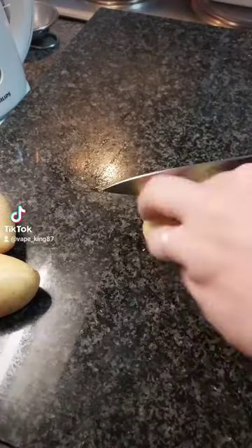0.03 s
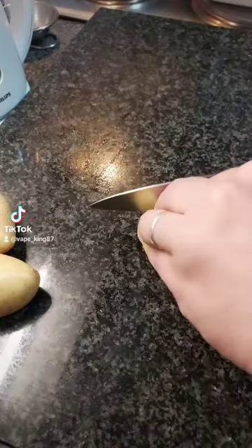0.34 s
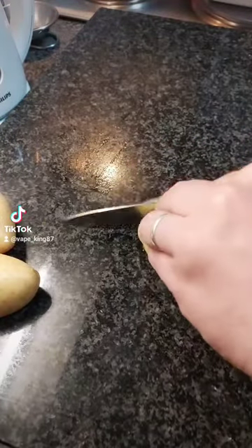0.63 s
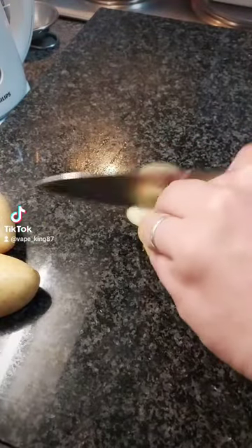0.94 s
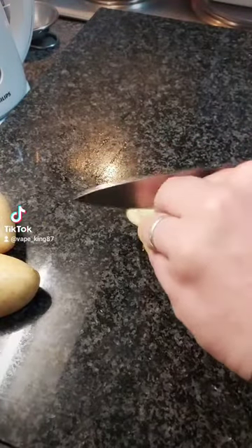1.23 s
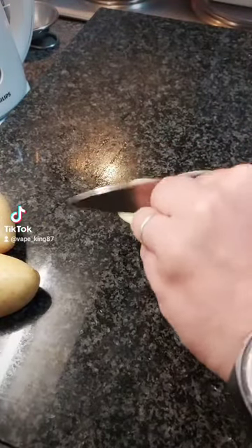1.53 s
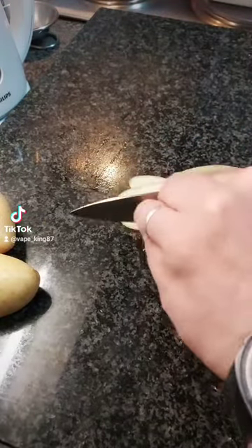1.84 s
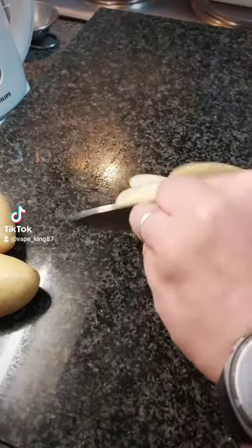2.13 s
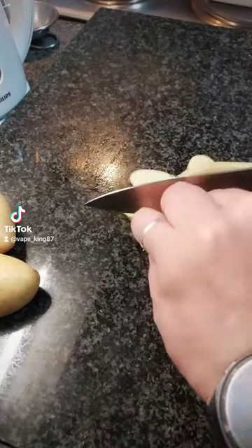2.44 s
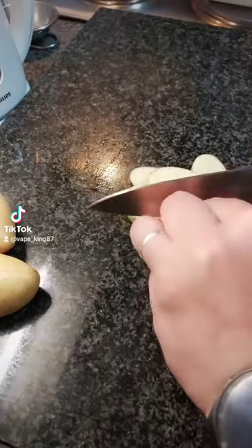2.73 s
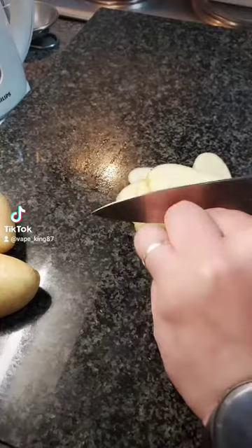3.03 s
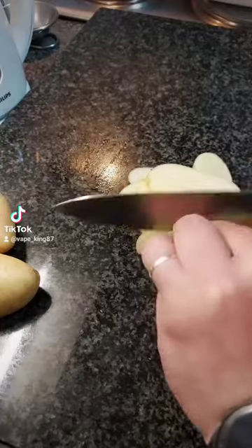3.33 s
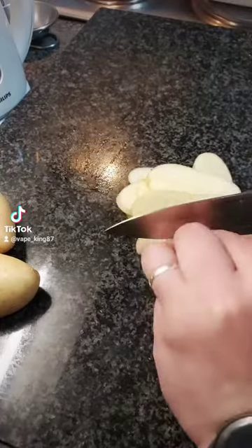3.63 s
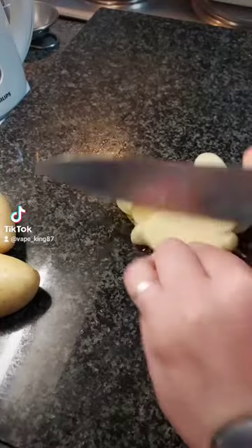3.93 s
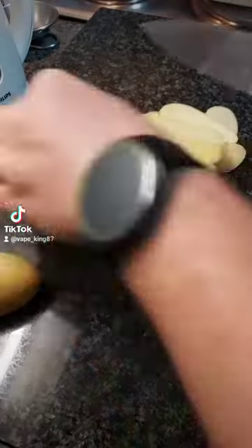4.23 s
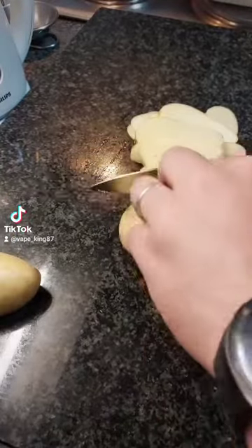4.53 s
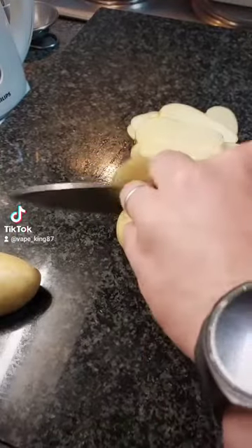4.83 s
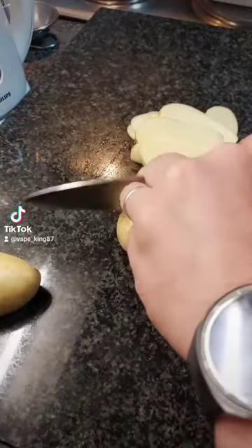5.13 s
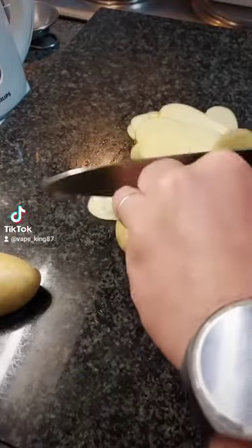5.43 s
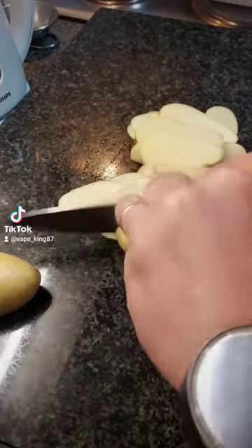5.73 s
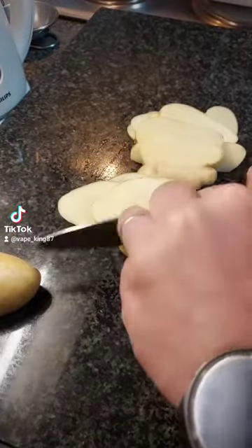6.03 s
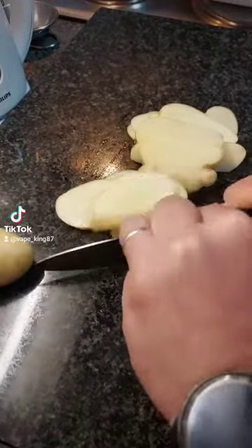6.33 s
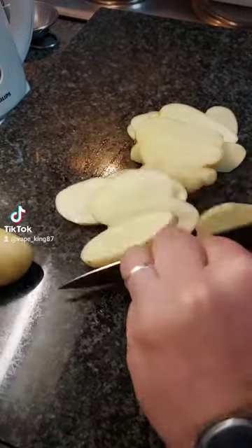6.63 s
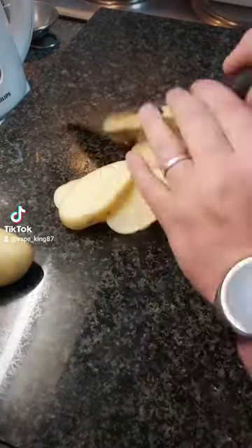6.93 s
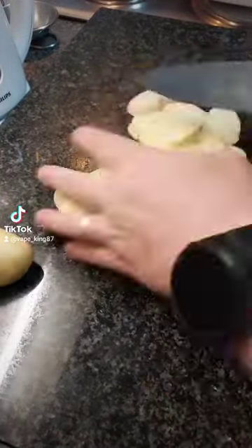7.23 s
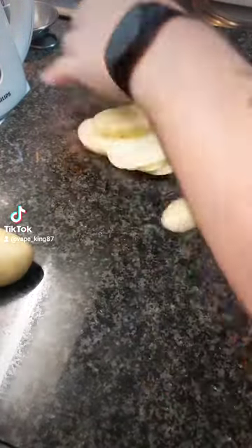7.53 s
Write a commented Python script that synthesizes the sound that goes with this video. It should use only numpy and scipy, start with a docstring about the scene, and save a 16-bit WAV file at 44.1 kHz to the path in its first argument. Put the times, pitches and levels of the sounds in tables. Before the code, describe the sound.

A knife cuts through raw potatoes close to the microphone, with crisp little rasps and hard clacks of steel on a stone counter. The knocks come steadily, grow softer and further apart, then pick up in a quick burst before stopping near the end. The small kitchen adds a short echo, and a draught buffets the microphone throughout with an uneven rumble and a low hum.

```python
"""Moving air rumbles on the two microphones of a propped-up phone in a small kitchen, and hoots once.
Then, close by, a steel knife slices raw potatoes on a stone worktop: each stroke hisses through
the wet flesh, and the blade knocks on the stone and rings between the near walls.
A hollow at the right microphone turns the air and the knocks into a low hum."""
import sys
import numpy as np
from scipy import signal
from scipy.fft import rfft, irfft, next_fast_len
from scipy.io import wavfile
from scipy.ndimage import uniform_filter1d

SR = 44100
rng = np.random.default_rng(int(sys.argv[2]) if len(sys.argv) > 2 else 0)


def to_wav(sig):
    """Store sig (one row per channel, or 1-D mono) as 16-bit WAV at the path in sys.argv[1].

    Samples outside -1..1 are clipped; the rate is SR.
    """
    pcm = np.clip(np.atleast_2d(sig), -1, 1) * 32767
    pcm = np.round(pcm).astype(np.int16)
    wavfile.write(sys.argv[1], SR, pcm.T)  # frames by channels


N = 343998
TIME = np.arange(N) / SR

# Knife strokes, levels relative within each column:
# contact t/s, time in the flesh/s, crunch/dB, contact rise/s, thud/dB, clack/dB, ring/dB, edge tick/dB
STROKES = [(0.478, 0.075, -20, .0006, -41, -12.5, -14, -14.5),
           (0.738, 0.044, -26, 0.00063, -21, -15.5, -15.5, -15),
           (0.976, 0.056, -24, 0.0063, -16, -25, -20, -42),
           (1.214, 0.039, -28, 0.00055, -20, -11.5, -15.5, -14),
           (1.438, 0.047, -26, 0.0068, -17, -21.5, -17, -48),
           (1.677, 0.035, -29.5, 0.0016, -17.5, -11, -16, -12),
           (1.973, 0.052, -26.5, 0.0077, -19.5, -22.5, -22, -17),
           (2.256, 0.068, -27, 0.01, -30, -30.5, -34.5, -29.5),
           (2.595, .055, -32, 0.00066, -22.5, -19, -22.5, -15),
           (2.946, 0.076, -31.5, 0.0053, -24.5, -16, -32.5, -22.5),
           (3.367, 0.14, -29, .011, -27.5, -27.5, -34, -23.5),
           (3.922, 0.106, -20.5, 0.0061, -21, -23.5, -27.5, -24),
           (4.736, .071, -23, 0.00057, -16.5, -16, -17, -34),
           (4.902, 0.041, -33.5, 0.0032, -16, -11, -15.5, -23),
           (5.084, 0.056, -32.5, 0.0048, -11, -25, -28, -52),
           (5.268, 0.077, -30.5, 0.0073, -20.5, -25.5, -21.5, -35),
           (5.455, 0.052, -29, 0.0022, -19, -21.5, -24.5, -49),
           (5.618, .054, -33, 0.0039, -16, -14, -17.5, -25),
           (5.804, 0.048, -29.5, .004, -18.5, -24.5, -21.5, -49),
           (5.989, 0.051, -27, 0.0018, -23.5, -23.5, -23, -20.5),
           (6.16, 0.066, -32, 0.0011, -13.5, -10, -16, -16),
           (6.425, .059, -22, 0.0027, -23, -22.5, -24.5, -18),
           (6.74, 0.088, -42.5, 0.00072, -16, -13, -19.5, -15)]
# modes of blade and worktop at the two microphones: f/Hz, width/Hz, left/dB, right/dB
KNIFE_MODES = [(1022, 14, -10.5, 1), (1104, 6, -20.5, -30), (1249, 25, -2.5, -21), (1374, 5.7, -3, -29),
               (1572, 53, 3.5, -1), (1618, 33, -4, 1), (2210, 34, 1, -2), (2823, 20, -7.5, 2.5),
               (3286, 40, 2.5, 6), (4024, 130, -32.5, -9.5), (4335, 71, -28, -22.5), (4504, 44, -8, 2),
               (4640, 120, -1, -12.5), (5100, 49, -6.5, -24), (5307, 26, -3.5, -2), (5550, 26, -4, -5.5),
               (6350, 34, -5, -20.5), (6720, 20, -3.5, -18), (7455, 26, -15, -1.5), (8070, 51, -11, -10.5),
               (8560, 31, -22.5, -8.5), (8850, 21, -13.5, -20.5), (10130, 60, -13, -13.5),
               (13400, 70, -15, -22), (13900, 70, -18, -14.5)]
# spectra of the parting flesh, the crack of steel on stone and the edge's tick: f/Hz, level/dB
CRUNCH_SPECTRUM = [(300, -15), (1000, -9.5), (2500, -5), (4700, -8), (7000, -7), (8700, -6.5),
                   (10000, -3.5), (12500, 0), (16000, -7.5)]
CRACK_SPECTRUM = [(250, -5), (400, 0.5), (540, 12.5), (800, -18.5), (1200, 10.5), (2000, -1.5),
                  (2600, -5.5), (4600, -14), (6500, -22), (9000, -15.5), (16000, -28)]
TICK_SPECTRUM = [(1000, -16), (4000, 8), (8500, -3), (10000, 1.5), (12500, 5), (16000, -11.5)]
# the draught at the microphones, relative levels: t/s, rumble and hum/dB, eddies/dB
DRAUGHT_LEVELS = [(0.0, -31.5, -35), (0.35, -25, -34.5), (0.5, -33.5, -41.5), (1.0, -43, -49.5),
                  (1.63, -33, -51.5), (2.45, -33.5, -49), (2.93, -27, -49.5), (3.63, -35.5, -53),
                  (4.0, -25, -44), (4.34, -26, -47), (4.54, -20.5, -43), (4.84, -36, -50),
                  (5.97, -42, -59.5), (6.52, -38.5, -43.5), (6.69, -27, -34), (7.19, -33, -39),
                  (7.47, -24, -30), (7.8, -27, -38)]
# gusts on top of it: start t/s, length/s, rumble/dB, hum/dB
AIR_GUSTS = [(0.239, 0.023, -20, -11.5), (0.816, 0.089, -33, -18.5), (1.524, 0.086, -29, -31),
             (1.627, 0.028, -21.5, -12), (2.192, 0.044, -22, -8), (2.31, 0.075, -30, -15),
             (2.511, 0.041, -23, -23), (2.758, 0.18, -22.5, -13), (3.03, 0.076, -25.5, -22.5),
             (3.25, 0.1, -24.5, -22), (3.827, 0.095, -17, -16), (4.005, 0.075, -23, -12),
             (4.391, 0.028, -13.5, -29), (4.493, 0.075, -19.5, -18), (4.656, 0.06, -15, -22),
             (6.527, .18, -12.5, -7), (6.749, 0.11, -33, -14.5), (7.257, 0.059, -15, -16),
             (7.399, 0.065, -15, -21), (7.592, 0.048, -21, -8.5)]
# course of the air's hiss: t/s, level/dB
HISS_LEVELS = [(0, -33), (.15, -27), (.45, -28.5), (.55, -39), (1.1, -41.5), (2.4, -47.5), (3.6, -48.5),
               (3.85, -37), (4.1, -39), (4.65, -32), (4.8, -43), (6.3, -50), (6.6, -43.5), (6.9, -59.5),
               (7.2, -53), (7.45, -44.5), (7.8, -42.5)]
# spectra of the air's rumble, eddies and hiss: f/Hz, level/dB
RUMBLE_SPECTRUM = [(15, -21.5), (30, -14), (55, -3), (90, 1), (140, 1.5), (220, -0.5), (300, -14),
                   (420, -11), (700, -26), (1500, -41.5), (4000, -105)]
EDDY_SPECTRUM = [(100, 6.5), (300, 3.5), (470, 5), (750, -1), (1100, -9), (1650, -13), (2400, -22),
                 (4000, -47.5), (9000, -57), (16000, -58.5)]
HISS_SPECTRUM = [(300, -22), (900, 2), (1700, 6.5), (2300, 0.5), (3300, -8), (5000, -9.5), (8500, -19.5),
                 (11500, -13.5), (16000, -26.5)]
# resonances of the hollow at the right microphone: f/Hz, width/Hz, relative level/dB
HOLLOW_MODES = [(269, 10.9, 5), (1020, 31, 12.5), (1758, 24, 7.5), (2870, 38, 2), (3400, 42, 6)]
# rumble at the sheltered right microphone against the left: f/Hz, gain/dB
RIGHT_SHELTER = [(100, -2.5), (200, -2.5), (280, 8.5), (380, -11.5), (1000, -19)]

HUM_HZ, HUM_WIDTH_HZ = HOLLOW_MODES[0][:2]
HARD_CLACK_DB = -11  # a clack entry this high marks a hard stroke


def knife(scatter_db=1.05, tilt_db_per_octave=1.25, even_rise_s=0.0014):
    """Each stroke cuts, then knocks. Returns the close sound and what goes out into the room."""
    direct, to_room = np.zeros((2, 2, N))
    t = np.arange(14400) / SR - .14  # steel meets stone at t = 0
    modes = mode_responses(len(t))
    mode_hz = np.array(KNIFE_MODES)[:, 0]
    family = np.digitize(mode_hz, [1180, 2500])  # low modes thud, middle ones clack, high ones ring
    octaves = np.log2(mode_hz / mode_hz[0])
    for when, length, crunch_db, rise, thud_db, clack_db, ring_db, tick_db in STROKES:
        # a quicker contact favours the blade's upper modes
        tilt_db = tilt_db_per_octave * np.log2(even_rise_s / rise) * octaves * (family == 2)
        # each stroke lands on another spot of the edge and favours other modes
        spot_db = scatter_db * rng.standard_normal(len(modes))
        struck = modes * undb(tilt_db + spot_db)[:, None, None]
        bodies = [struck[family == k].sum(axis=0) for k in range(3)]
        cut = at_peak(crunch(t, length, blade=bodies[2]), crunch_db)
        stroke = cut + knock(t, bodies, rise, thud_db, clack_db, ring_db, tick_db)
        # the harder the clack, the drier the stroke; the last one stops dead
        send_db = np.interp(HARD_CLACK_DB - clack_db, [0, 7.5], [-4.5, 1.5])
        if when == STROKES[-1][0]:
            send_db = -15.5
        add(direct, stroke, when + t[0])
        add(to_room, stroke * undb(send_db), when + t[0])
    return direct, to_room


def crunch(t, length, blade, swell_db_per_s=270, grain_db=2.5, jerk_db=3.0, entry_s=0.0083, t60=0.046):
    """The edge breaks the skin and rasps through the cells up to a last snap; the blade sings along."""
    cells = rng.standard_normal((2, len(t)))
    cells *= undb(grain_db * np.repeat(rng.standard_normal(len(t) // 20), 20))
    jerks = np.interp(t, np.linspace(t[0], t[-1], num=80), rng.standard_normal(80))
    entry = np.clip((t + length) / entry_s, 0, 1)
    depth = np.clip((t + length) / (length - .008), 0, 1)
    swell_db = -swell_db_per_s * length * (1 - depth ** 1.11)  # a slow cut starts more quietly
    bursts = cells * entry * undb(swell_db + jerk_db * jerks) * fade(t + 0.004, t60)
    flesh = unit(colour(bursts, CRUNCH_SPECTRUM))
    steel = unit(irfft(rfft(bursts) * blade))
    return flesh + undb(-11) * steel


def knock(t, bodies, rise, thud_db, clack_db, ring_db, tick_db):
    """The edge lands and grates for a moment, driving the modes of blade and worktop."""
    drag_s = 6 * rise  # a soft landing grates longer
    dwells_s = np.array([0.0042, .0055, .008])  # thud, clack, ring
    levels_db = (thud_db - 4.0, clack_db - 2, ring_db + 0.27)
    pressure = strike(t, rise, t60=0.0053 + drag_s, dwell=dwells_s[:, None, None])
    grate = rng.standard_normal((3, 2, len(t))) * pressure
    out = sum(at_peak(irfft(rfft(force) * body), db) for force, body, db in zip(grate, bodies, levels_db))
    # the very first touch of steel on stone is the sharpest
    first_touch = 1 + 1.2 * np.exp(-((t - .0012) / 0.0015) ** 2)
    crack, tick = rng.standard_normal((2, 2, len(t))) * first_touch
    crack = colour(crack, CRACK_SPECTRUM) * strike(t, rise, t60=0.051 + drag_s, dwell=dwells_s[0])
    tick = colour(tick, TICK_SPECTRUM) * strike(t, rise / 2, t60=0.044 + drag_s)
    out += at_peak(crack, (clack_db + ring_db) / 2 - 5.5)
    out += at_peak(tick, tick_db - 5.0)
    # the blow also sets the hollow at the right microphone humming
    hum = np.sin(2 * np.pi * HUM_HZ * t) * strike(t, rise=0.005, t60=0.2)
    force_db = max(thud_db, clack_db) - HARD_CLACK_DB
    out[1] += undb(-13 + 0.17 * force_db) * hum
    return out


def mode_responses(size):
    """Frequency response of each damped mode of blade and worktop, at the left and right microphone."""
    f = np.fft.rfftfreq(size, 1 / SR)
    return np.array([undb([[left_db], [right_db]]) * 1j * f * width / (hz ** 2 - f ** 2 + 1j * f * width)
                     for hz, width, left_db, right_db in KNIFE_MODES])


def kitchen(x, low_t60=0.32, high_t60=0.11, split_hz=6000, build_s=0.014):
    """Dense reflections from near walls and cupboards; the treble dies first."""
    t = np.arange(SR // 2) / SR
    noise = rng.standard_normal((2, len(t)))
    low = pass_band(noise, split_hz, "low") * fade(t, low_t60)
    high = pass_band(noise, split_hz, "high") * fade(t, high_t60)
    tail = (low - undb(3) * high) * np.minimum(t / build_s, 1)
    tail /= np.sqrt(np.sum(fade(t, low_t60) ** 2))
    return undb(-6) * signal.oaconvolve(x, tail, axes=1)[:, :N]


def air():
    """Moving air shakes both microphones; the left stands open, the right is sheltered by its hollow."""
    noise = rng.standard_normal((4, N))
    rumble_level, hum_level, eddy_level = airflow()
    rumble = steady(colour(noise[0], RUMBLE_SPECTRUM), seconds=0.21) * rumble_level
    hum = resonate(resonate(noise[0], HUM_HZ, HUM_WIDTH_HZ), HUM_HZ, width=50)
    hum = steady(hum, seconds=0.078) * hum_level
    eddies = unit(colour(noise[1], EDDY_SPECTRUM)) * eddy_level
    hiss = unit(colour(noise[2:], HISS_SPECTRUM)) * curve(HISS_LEVELS) * undb(2.2 * waver(per_s=38))
    open_air = eddies + hiss[1]
    hollow = sum(undb(db) * resonate(open_air, hz, width) for hz, width, db in HOLLOW_MODES)
    fizz = pass_band(hiss[1], 9000, "high")
    left = rumble + eddies + hiss[0]
    right = colour(rumble, RIGHT_SHELTER) + hum
    right += undb(-0.5) * hollow + undb(-10.5) * open_air + undb(-3.5) * fizz
    return np.array([left, right])


def airflow():
    """Gains of rumble, hum and eddies over time: the wavering draught and the gusts add in power."""
    gusts = np.array(AIR_GUSTS)
    puffs = np.array([puff(start, length, attack=0.021, t60=0.17) for start, length in gusts[:, :2]])
    gust_rumble, gust_hum = np.sqrt(undb(gusts[:, 2:].T) ** 2 @ puffs ** 2)
    gust_eddies = undb(-13.5) * gust_rumble
    rumble = curve(DRAUGHT_LEVELS) * undb(3 + 2.5 * waver(per_s=14))
    hum = curve(DRAUGHT_LEVELS) * undb(6.5 + 6.5 * waver(per_s=14))
    eddies = curve(DRAUGHT_LEVELS, column=2) * undb(8.5)
    return np.hypot(rumble, gust_rumble), np.hypot(hum, gust_hum), np.hypot(eddies, gust_eddies)


def hoot(start_s=0.349, pitch_hz=442.5, wobble=0.016, settle_s=0.0098, flutter_per_s=80):
    """Air over an opening catches with a burst, settles and flutters, mostly at the left microphone."""
    burst_db = 13 * np.exp(-np.maximum(TIME - start_s, 0) / settle_s)
    flutter_db = 2 * waver(flutter_per_s)
    level = undb(-12.5 + burst_db + flutter_db) * puff(start_s, length=.12, attack=0.0074, t60=0.025)
    hz = pitch_hz * (1 + wobble * waver(flutter_per_s))
    return undb([[0], [-18]]) * level * np.sin(2 * np.pi * np.cumsum(hz) / SR)


def strike(t, rise, t60, dwell=0):
    """Envelope of a blow: it builds around t = 0, holds while the blade presses, then dies."""
    return (1 + np.tanh(t / rise - .5)) / 2 * fade(t - rise - dwell, t60)


def puff(start, length, attack, t60):
    """Envelope of a push of air: attack, hold, release."""
    return np.clip((TIME - start) / attack, 0, 1) * fade(TIME - start - length, t60)


def fade(t, t60):
    """Decay from t = 0, by 60 dB every t60 seconds."""
    return np.exp(-np.log(1000) * np.maximum(t, 0) / t60)


def waver(per_s):
    """Random values at this rate, joined by straight lines."""
    values = rng.standard_normal(2000)
    return np.interp(TIME * per_s, np.arange(len(values)), values)


def curve(rows, column=1):
    """Gain over time from one dB column of a table."""
    rows = np.array(rows)
    return undb(np.interp(TIME, rows[:, 0], rows[:, column]))


def colour(x, spectrum):
    """Filter by a spectrum of points: f/Hz, level/dB."""
    hz, db = np.transpose(spectrum)
    size = next_fast_len(x.shape[-1], True)
    f = np.fft.rfftfreq(size, 1 / SR)
    gain = undb(np.interp(np.log(f + 1), np.log(hz), db))
    return irfft(rfft(x, size) * gain, size)[..., :x.shape[-1]]


def resonate(x, hz, width):
    """One resonance, gain 1 at its centre."""
    return signal.lfilter(*signal.iirpeak(hz, hz / width, fs=SR), x)


def pass_band(x, hz, kind):
    """Second-order low-pass or high-pass."""
    return signal.sosfilt(signal.butter(2, hz, kind, fs=SR, output="sos"), x)


def steady(x, seconds):
    """Even out the slow swells of a noise."""
    return x / np.sqrt(uniform_filter1d(x ** 2, int(seconds * SR)) + 1e-12)


def at_peak(x, db):
    """Scale a stereo burst so that its loudest hundredth of a second has this rms."""
    power = uniform_filter1d(np.mean(x ** 2, axis=0), SR // 100)
    return x * undb(db) / np.sqrt(power.max())


def unit(x):
    """Scale to rms 1."""
    return x / np.sqrt(np.mean(x ** 2))


def undb(db):
    """Decibels to gain."""
    return 10 ** (np.asarray(db) / 20)


def add(out, x, start_s):
    """Mix a stereo sound in at a time."""
    i = int(start_s * SR)
    out[:, i:i + x.shape[1]] += x[:, :N - i]


def scene():
    """The knife close up, the kitchen around it, and the air right on the microphones."""
    direct, to_room = knife()
    return direct + kitchen(to_room) + air() + hoot()


def record(dry, top_hz=15900):
    """The phone clips the highest peaks and cuts the top of the treble."""
    low_pass = signal.ellip(10, .2, 80, top_hz, fs=SR, output="sos")
    return signal.sosfilt(low_pass, np.clip(dry, -1, 1))


dry = scene()
out = record(dry)
to_wav(out)
```